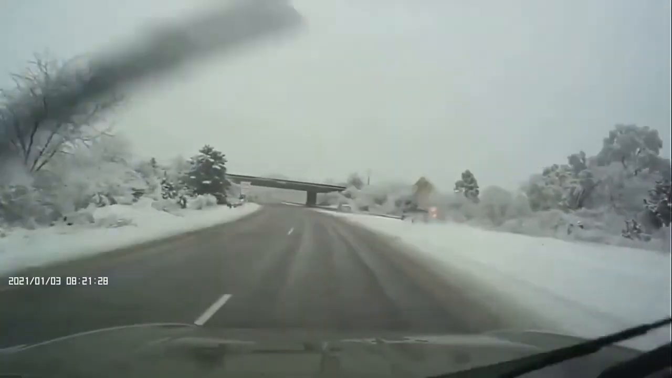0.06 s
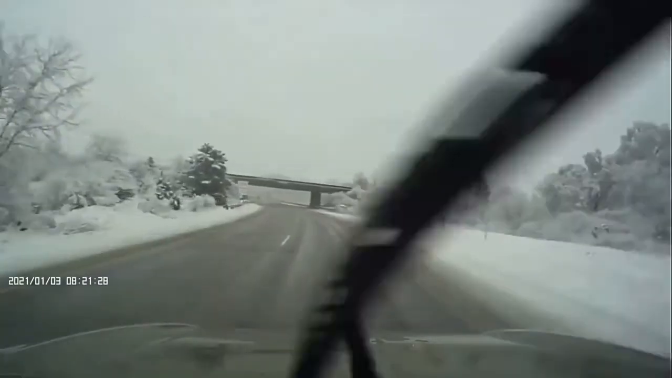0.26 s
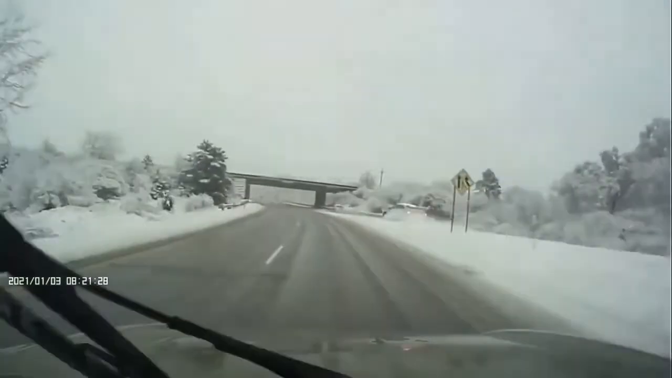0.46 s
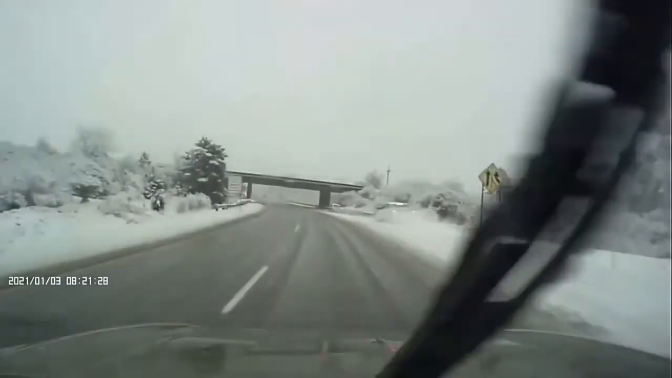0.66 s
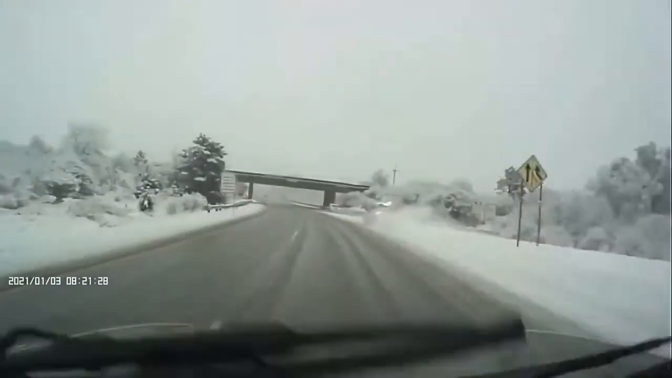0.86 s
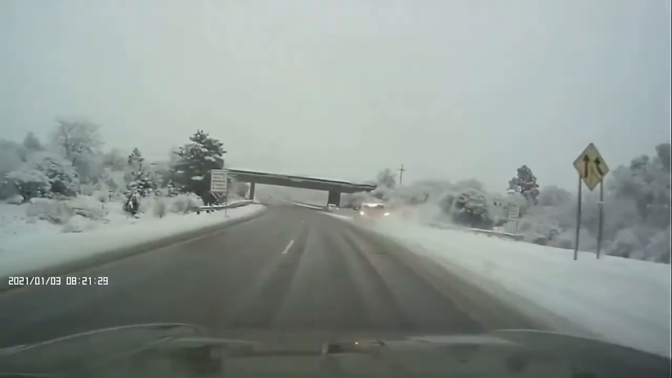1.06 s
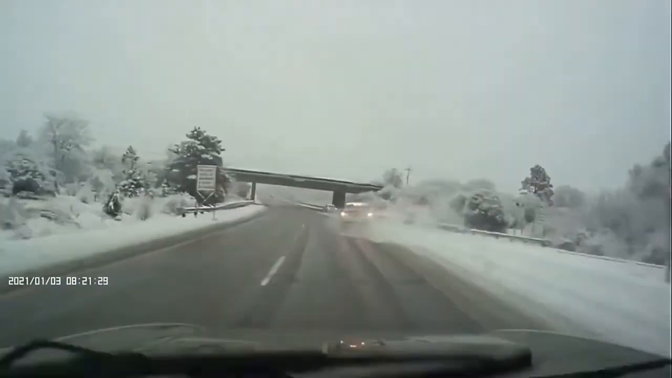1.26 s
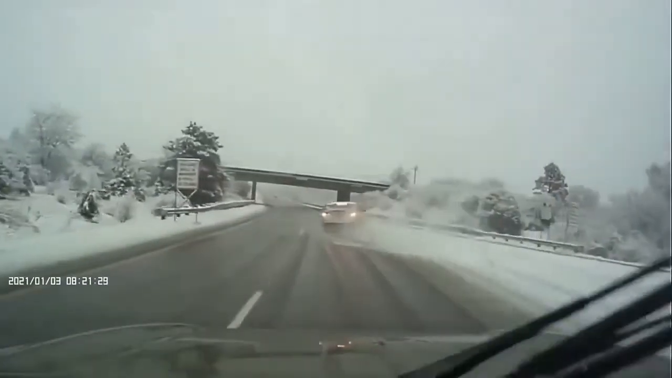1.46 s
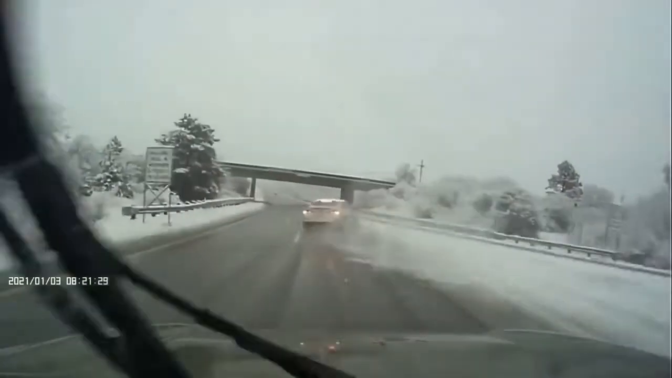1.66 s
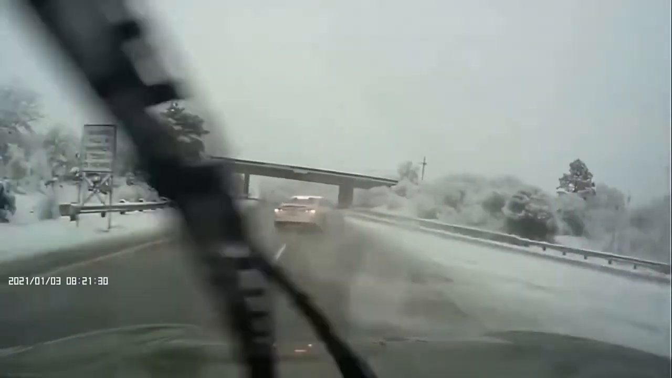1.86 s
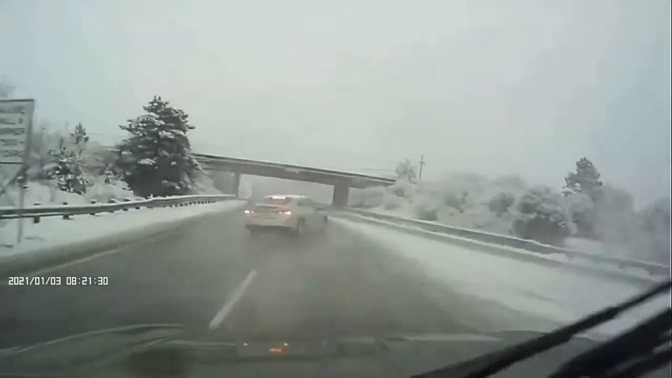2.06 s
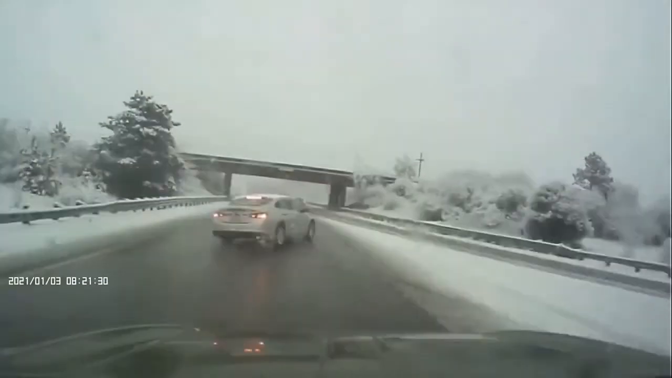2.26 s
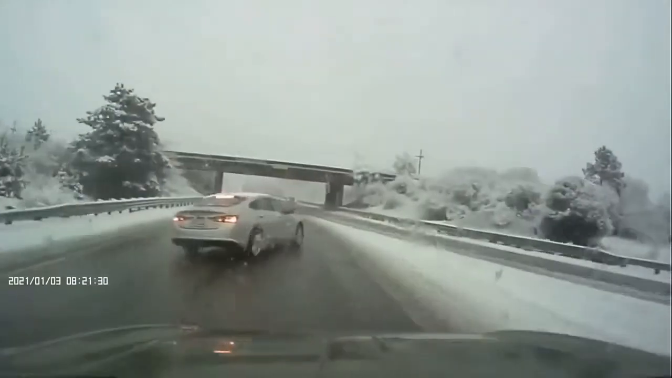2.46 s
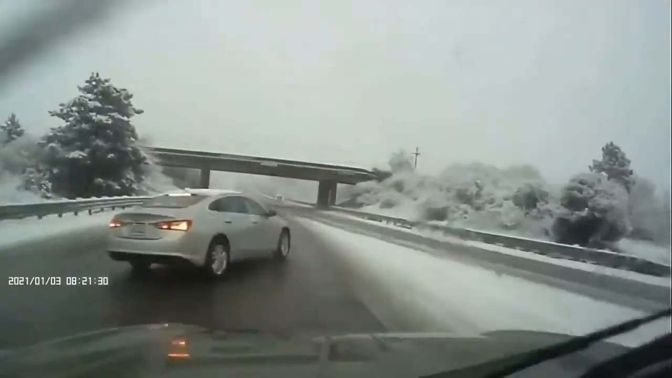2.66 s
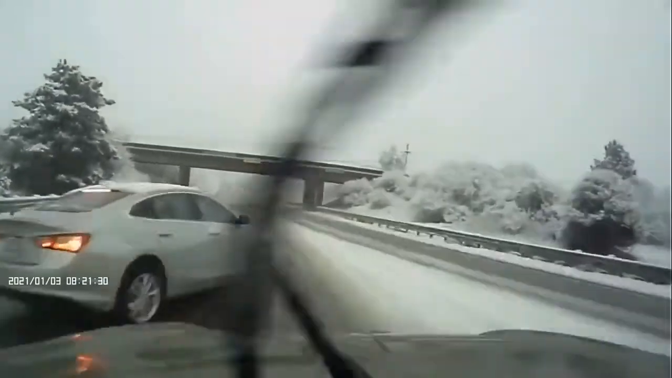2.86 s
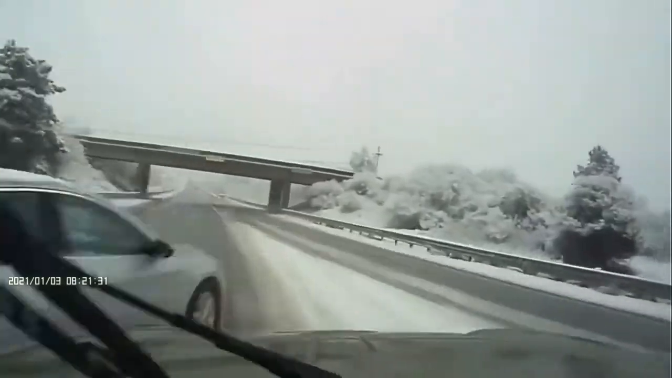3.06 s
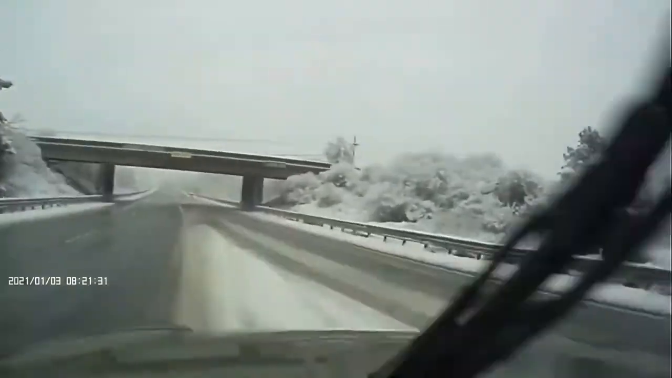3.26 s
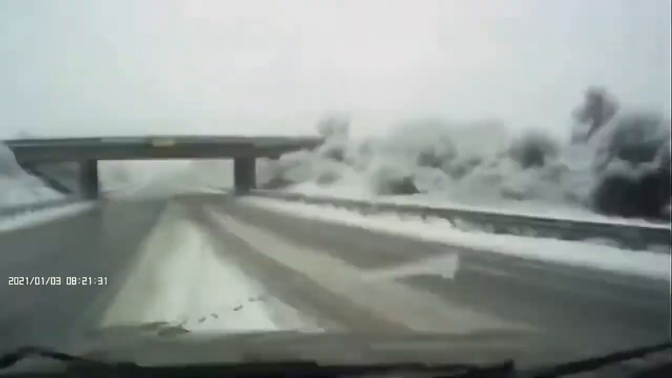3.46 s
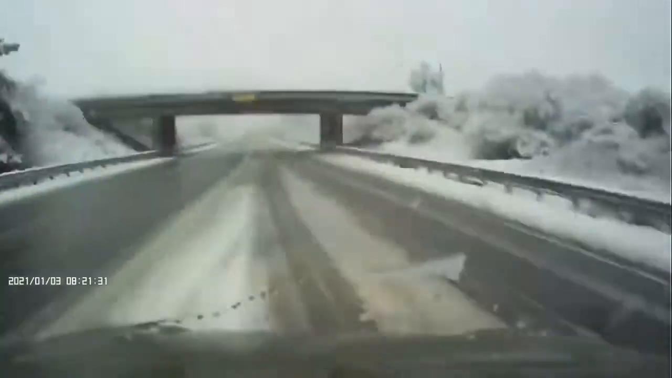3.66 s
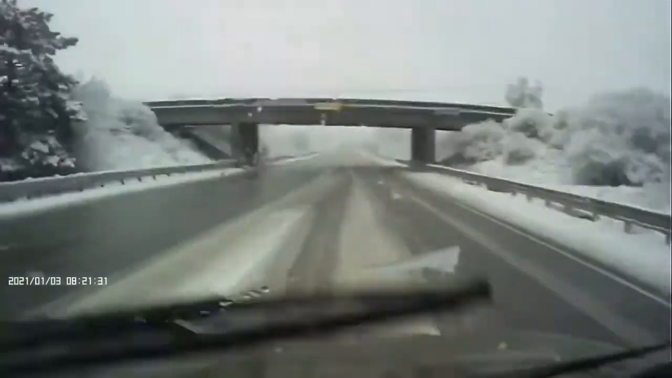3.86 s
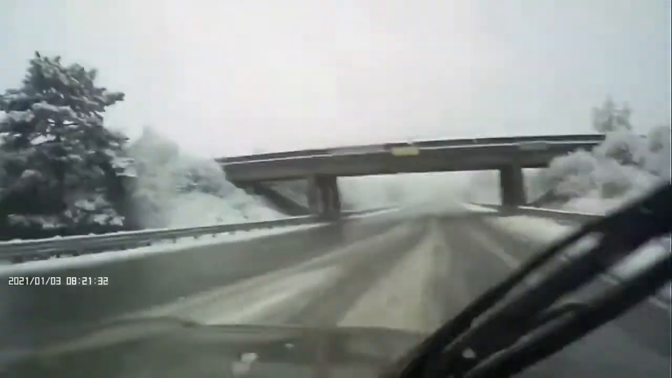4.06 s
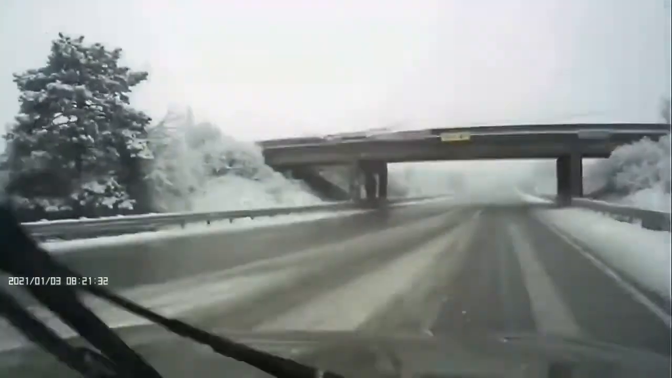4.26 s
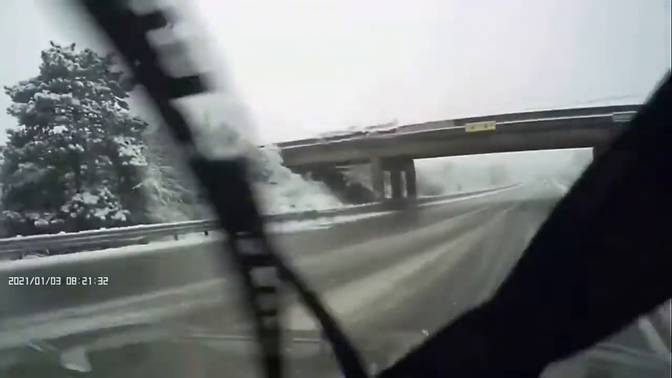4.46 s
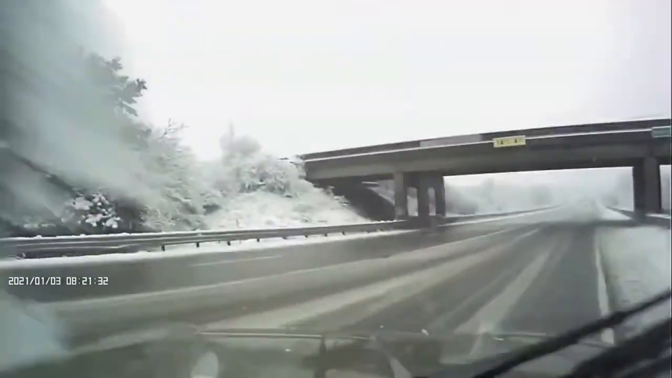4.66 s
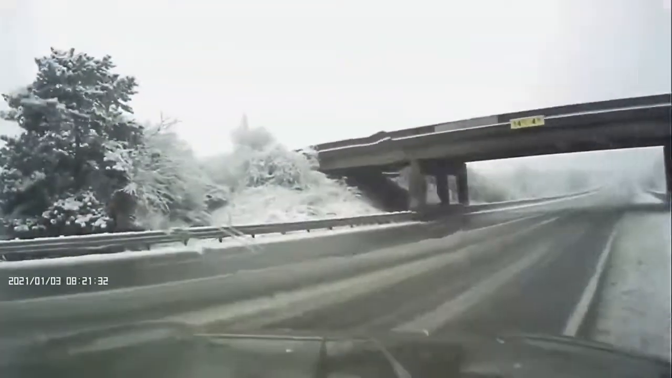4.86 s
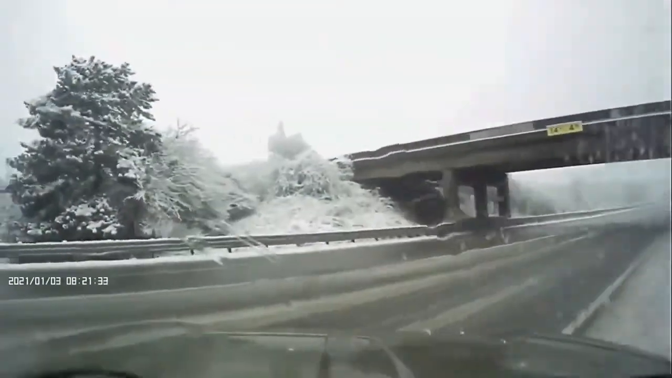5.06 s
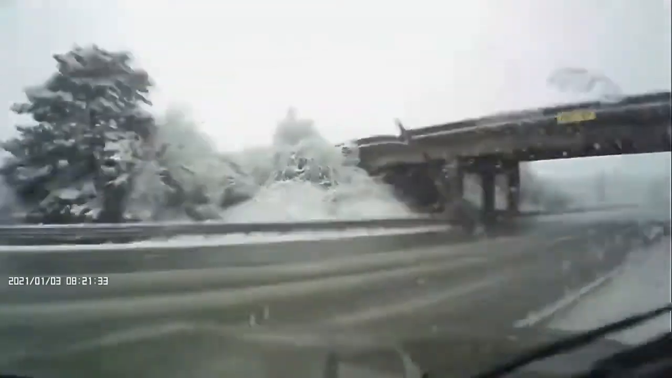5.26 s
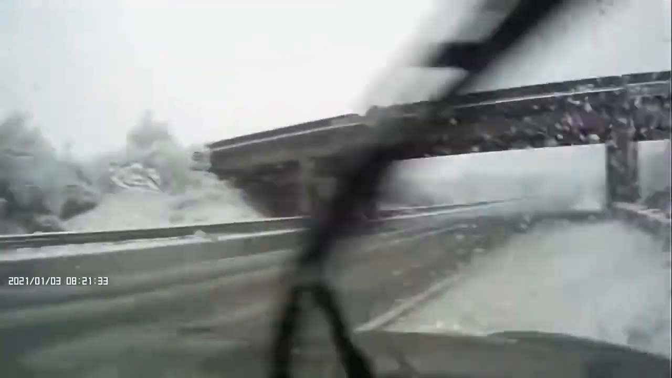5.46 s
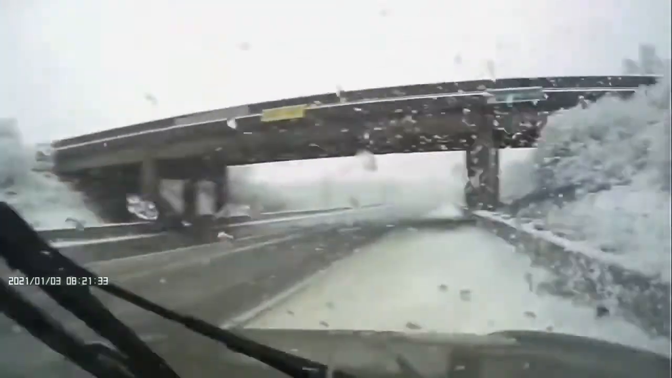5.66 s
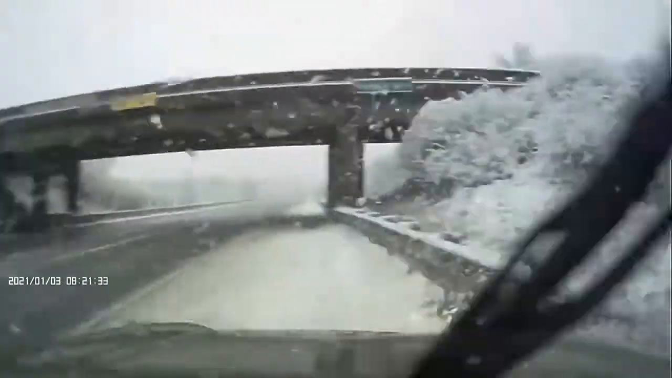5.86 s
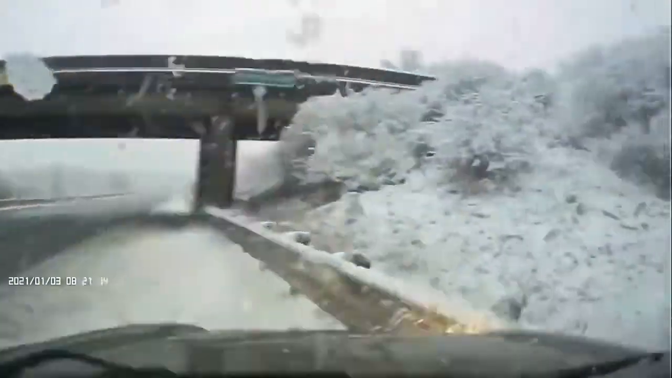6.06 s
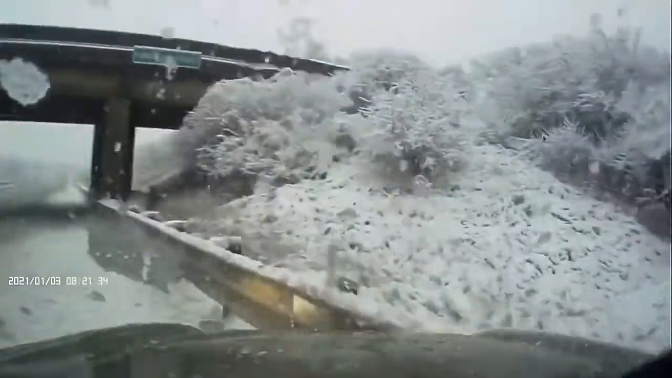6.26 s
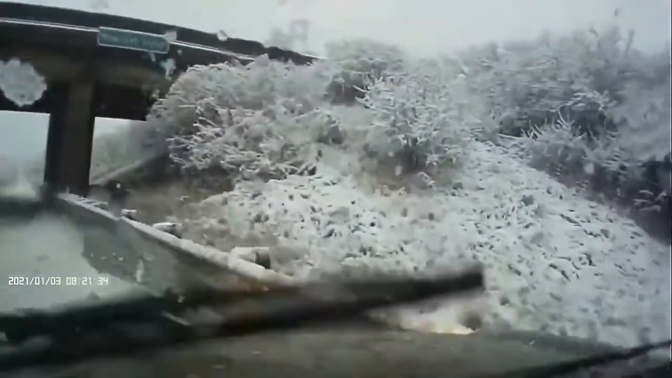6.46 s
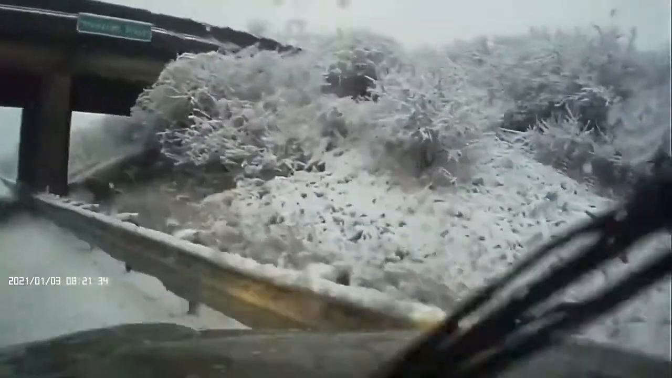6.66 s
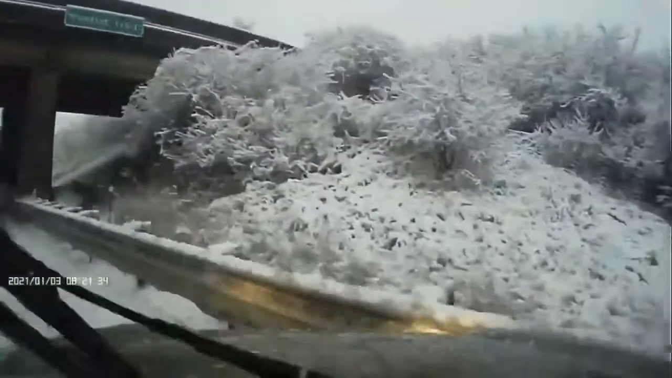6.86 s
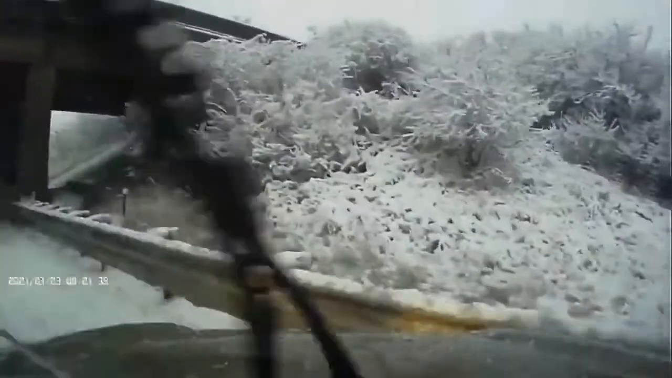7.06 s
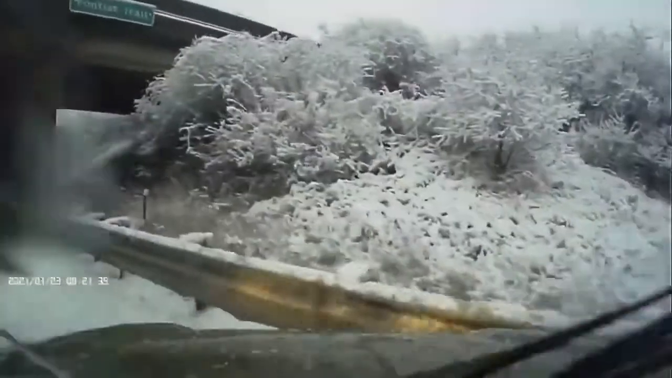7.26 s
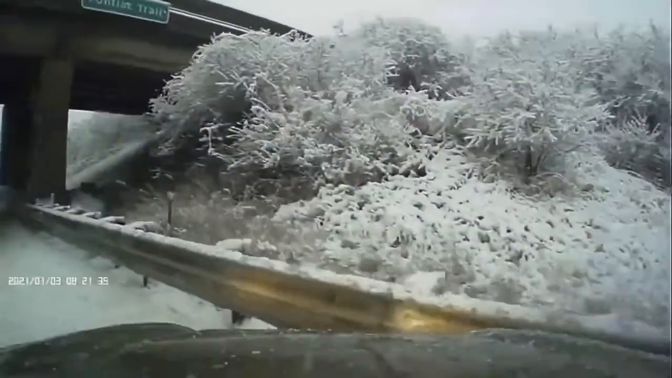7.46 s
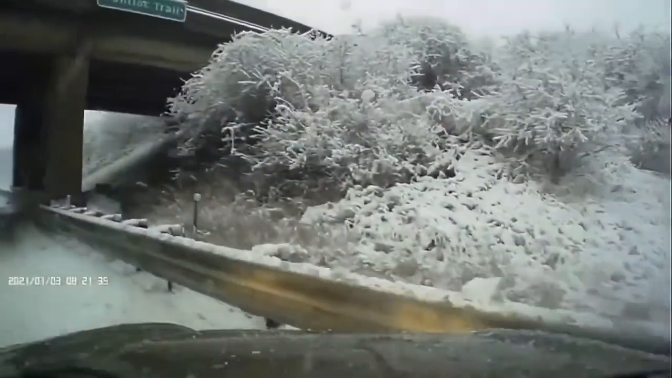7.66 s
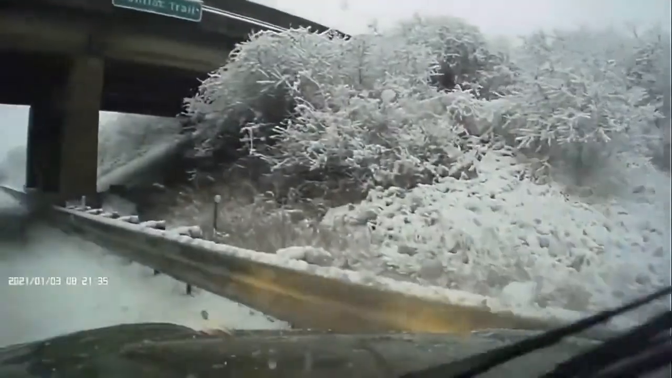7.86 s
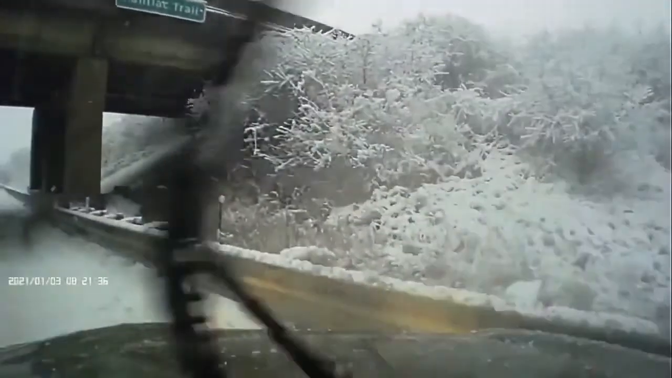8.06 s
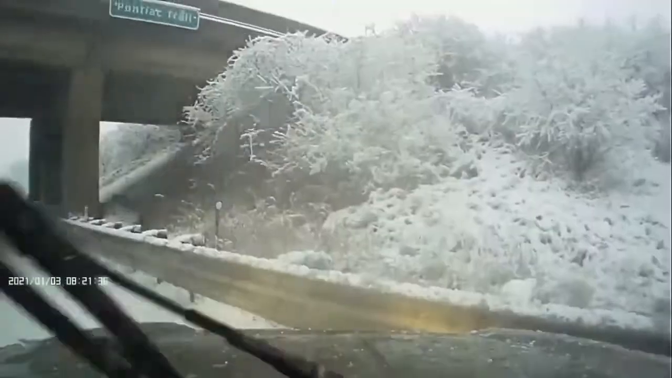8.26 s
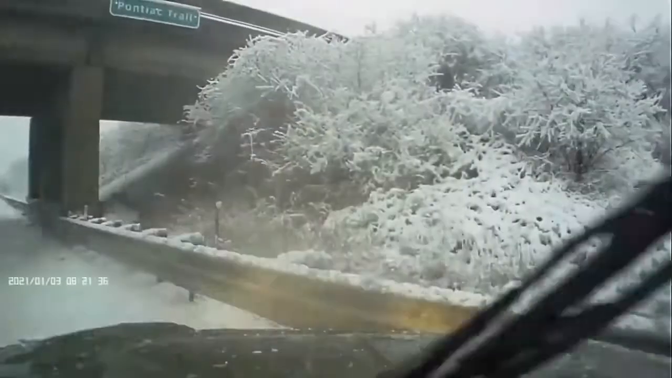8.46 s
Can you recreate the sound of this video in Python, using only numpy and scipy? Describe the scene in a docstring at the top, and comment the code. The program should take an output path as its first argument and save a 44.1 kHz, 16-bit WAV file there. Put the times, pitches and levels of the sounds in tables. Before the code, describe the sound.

Heard from inside a car on a slushy road through a small microphone with faint hiss and thin electrical tones. From 0 to 3.2 seconds there is quiet, steady low-mid road roar, a humming tread drone that drops and fades slightly after 2, deep cabin boom, and a barely audible buzz around 2.4. At 3.27 a light double knock and scrape; at 3.5 the roar gives way to violent thuds, the heaviest near 3.6, deep and distorted with sharp clicks, panel knocks, grinding and trim rattle. Strong jolts continue to about 4.5, with short creaks, then weaker bumps over dragging slush. At 5.38 another hard, hollow bang and grinding, followed by ticks, scrapes and tiny key jingles at 5.5 to 5.8. Smaller knocks and crunches come near 6.4, then sparse creaks and ticks. After 7.5 it is almost still, low rumble fading into hiss by 8.5.

```python
"""Car sliding off a slushy highway

Heard inside the car: road roar, tread drone and cabin boom, then the car clips an obstacle, bucks over
packed slush, scrapes a guard rail and judders to a stop. Thuds, grinding, rattle and boom are noise coloured
by resonances; jolts, knocks, ticks and keys are decaying modes; creaks are sliding tones.
The hardest jolts overload the microphone; faint hiss and electrical tones run throughout."""
import sys
import numpy as np
from scipy import signal
from scipy.fft import rfft, irfft, next_fast_len
from scipy.io import wavfile
from scipy.ndimage import uniform_filter1d, map_coordinates

SR = 44100
rng = np.random.default_rng(int(sys.argv[2]) if len(sys.argv) > 2 else 0)


def to_wav(s):
    """Save 16-bit WAV."""
    ch = np.atleast_2d(s).T  # columns
    pcm = np.round(np.clip(ch, -1, 1) * 32767)  # PCM
    wavfile.write(sys.argv[1], SR, pcm.astype(np.int16))


N = 375715
T = np.arange(N) / SR  # time axis, s

# In every table, relative_db is a level before later gain or normalisation.
# steady drag of slush under the sliding car: time_s, grinding_db
DRAG = [(3.45, -68), (3.52, -25.5), (3.9, -33.5), (4.07, -40.5), (4.3, -24.5), (4.55, -30.5), (4.68, -35.5),
        (4.85, -31), (5.3, -43.5), (5.45, -26), (5.75, -32.5), (6.12, -47), (6.3, -44.5), (6.45, -30.5),
        (6.6, -40.5), (7.05, -45.5), (7.2, -51.5), (7.45, -50), (7.8, -52.5), (8.52, -56)]
DRAG_THUD_DB, DRAG_RATTLE_DB = 6, -24  # relative to the grinding
# bumps over packed slush, rail and bank: start_s, held_s, thudding_db, grinding_db, rattle_db
BUMPS = [(3.515, 0.045, -9, -16.5, -40), (3.582, 0.065, -5.5, -16.5, -38), (3.674, 0.0044, 2, -13, -27),
         (3.691, 0.018, -4.5, -10.5, -29.5), (3.73, 0.005, -16, -25, -44), (3.756, 0.004, -7, -17, -38),
         (3.81, 0.041, -16, -28.5, -51.5), (3.902, 0.036, -26, -35.5, -46.5),
         (3.939, 0.0051, -8.5, -36, -56), (4.019, 0.025, -13.5, -34, -58), (4.095, 0.0062, 1.5, -18.5, -39),
         (4.195, 0.074, -21.5, -33, -51), (4.259, 0.025, -9, -24, -44), (4.371, 0.18, -16.5, -33.5, -51.5),
         (4.48, 0.059, -13, -20.5, -48), (4.698, 0.071, -21.5, -28, -50.5), (4.759, 0.11, -34, -49, -68),
         (4.976, 0.054, -18.5, -40, -60), (5.144, 0.047, -27.5, -32, -60), (5.37, 0.017, -9, -18.5, -42),
         (5.383, 0.013, -9.5, -13.5, -44), (5.5, 0.039, -17, -21.5, -48), (5.6, 0.021, -22, -24, -52.5),
         (5.783, 0.035, -28, -27.5, -42.5), (5.905, 0.1, -40, -53, -61), (6.216, 0.037, -27, -47, -68),
         (6.344, 0.043, -20, -21.5, -52), (6.376, 0.048, -17, -22.5, -47), (6.53, 0.03, -47, -35, -55),
         (6.631, 0.13, -29.5, -63, -67), (6.9, 0.045, -53, -48, -60.5), (6.98, 0.094, -34.5, -42.5, -67),
         (7.258, 0.05, -65, -43, -54), (7.365, 0.078, -56, -44.5, -57), (7.47, 0.17, -59, -73, -65.5),
         (7.711, 0.016, -33.5, -53, -84), (7.921, 0.037, -44, -47.5, -65)]
BUMP_ATTACK_S = 0.0051
# rate of fall after a bump, for thudding, grinding, rattle: fade_db_per_s
BUMP_FADES = [298.5, 340.5, 302.5]
# load on the floor pan, upper over lower modes: time_s, balance_db
PAN_LOAD = [(3.5, 8), (4.0, 1.5), (4.5, 5), (5.0, 20.5), (5.5, 2.5), (6.4, 19), (6.8, 7.5), (7.05, 24.5),
            (8.5, 4.5)]
# floor pan thudding colour: frequency_hz, relative_db (per Hz)
FLOOR_PAN_COLOUR = [(53, -18), (90, 4.5), (124, 7), (189, -5), (273, -7), (362, -22), (400, -16),
                    (520, -53.5), (880, -120)]
# underbody grinding colour: frequency_hz, relative_db (per Hz)
GRINDING_COLOUR = [(190, -27), (330, 5), (369, -3.5), (458, 0), (504, 2.5), (574, 1), (883, -3.5),
                   (1620, -39.5), (1780, -29.5), (2240, -45), (2600, -51.5), (3380, -71), (5720, -120)]
# trim rattle colour: frequency_hz, relative_db (per Hz)
RATTLE_COLOUR = [(760, -9), (1300, 0), (1550, -0.5), (1650, -9), (2050, -7.5), (2450, -10.5), (2870, -7.5),
                 (3300, -13.5), (3900, -13), (4510, -14), (5200, -13.5), (6690, -23), (7660, -21),
                 (8580, -29.5), (10300, -32), (14100, -31), (15500, -53.5)]
# body panel modes: frequency_hz, relative_db, t60_s
PANEL_MODES = [(122, 0, .1), (215, 0, .07), (268, 0, .07), (400, -2, .05), (530, -1, .045), (730, -1, .045),
               (890, -1, .04), (1120, -4, .03)]
# plastic trim modes: frequency_hz, relative_db, t60_s
PLASTIC_MODES = [(1270, -4, 0.015), (1790, -15.5, 0.018), (2863, 11.5, 0.01), (4195, 7, 0.0092),
                 (4520, 5.5, 0.021), (5700, 13.5, 0.0052)]
# jolts that set the whole body ringing: start_s, level_db, pitch_hz, t60_s, pressure_sag (share of the swing)
JOLTS = [(3.519, -6, 45, 0.42, 0.2), (3.632, 10, 37, .75, .85), (3.93, -6, 42, 0.53, 0),
         (4.125, -2.5, 37.3, 0.32, 0), (4.278, -5, 38, 0.53, 0.27), (5.394, 4, 47, .25, .2),
         (5.518, -10, 41.3, 0.3, 0.3)]
# cabin boom: time_s, level_db
BOOM_LEVEL = [(0, -29), (1.97, -28), (2.2, -31), (3.1, -31), (3.33, -22), (3.49, -32), (3.56, -8.5),
              (3.63, -17), (3.8, -20), (3.91, -26), (4.03, -15), (4.21, -23.5), (4.3, -11.5), (4.7, -24),
              (5.36, -23), (5.47, -15), (5.56, -17.5), (5.9, -30.5), (6.35, -30.5), (6.7, -26.5),
              (7.13, -25.5), (7.3, -29.5), (8.08, -30), (8.21, -41), (8.52, -54)]
# cabin boom colour: frequency_hz, relative_db (per Hz)
CABIN_COLOUR = [(11, -45), (18, -4.5), (27, 4), (43, 1), (65, -0.5), (85, -11.5), (97, -10.5), (162, -19),
                (200, -26.5), (260, -46), (440, -120)]
# knocks on the body: start_s, relative_db, favoured_pitch_hz
KNOCKS = [(3.273, -14, 890), (3.281, -9, 460), (3.52, -13.5, 596), (3.538, -4, 496), (3.558, -6, 400),
          (3.594, -6, 500), (3.698, -2, 590), (3.737, 4, 610), (3.76, -8, 500), (3.815, -20, 597),
          (3.864, -1, 338), (3.945, -1, 305), (4.002, -13.5, 400), (4.098, -5, 150), (4.205, -9, 334),
          (4.268, -10, 493), (4.293, -14, 594), (4.324, -13, 680), (4.385, -5.5, 480), (4.415, -14, 550),
          (4.496, -10, 403), (4.52, -7, 845), (4.603, -6.5, 169), (4.705, -12, 500), (4.745, -13, 280),
          (4.779, -18, 250), (4.829, -11, 600), (4.865, -6.5, 141), (4.934, -12.5, 540), (4.987, -5, 270),
          (5.027, -9, 247), (5.31, -16.5, 280), (5.372, -3, 400), (5.382, 2.5, 550), (5.392, 5, 530),
          (5.409, -9.5, 795), (5.433, -14, 500), (5.449, -9.5, 700), (5.51, -16, 400), (5.518, -22, 600),
          (5.533, -14.5, 900), (5.605, -3.5, 494), (5.79, -13, 593), (6.217, -15, 213), (6.37, -15.5, 805),
          (6.385, -2.5, 302), (6.408, -8.5, 600), (6.418, -8, 200), (6.425, -5.5, 270), (6.46, -10.5, 500),
          (6.575, -17, 201), (6.932, -22.5, 900), (6.946, -25, 214), (6.983, -23, 794), (6.996, -21, 268),
          (7.029, -16.5, 245), (7.288, -20.5, 814), (7.516, -28.5, 390), (7.683, -33, 1100),
          (7.712, -20.5, 215), (7.745, -33, 755), (7.921, -31.5, 1110), (8.085, -31.5, 730),
          (8.462, -30.5, 295)]
# short scrapes: start_s, level_db, length_s
SCRAPES = [(3.272, -42.5, 0.015), (4.197, -49.5, 0.018), (4.7, -52, 0.0068), (5.214, -51.5, 0.048),
           (5.786, -43, 0.064), (5.908, -45, 0.041), (6.498, -46.5, 0.03), (6.549, -34, 0.008),
           (6.63, -59, 0.083), (6.793, -60.5, 0.12), (7.271, -49, 0.046), (7.366, -51.5, 0.07)]
# creaks of loaded bodywork: start_s, length_s, level_db, first_pitch_hz, last_pitch_hz
CREAKS = [(3.942, 0.026, -11, 216, 316), (4.018, 0.015, -20, 700, 800), (4.288, 0.015, -13.5, 495, 703),
          (4.545, 0.035, -16, 259, 304), (5.47, 0.028, -38, 900, 970), (5.64, 0.084, -30, 898, 857),
          (5.895, 0.04, -34.5, 834, 890), (6.44, 0.049, -34, 947, 810), (6.925, 0.0237, -39, 598, 1010),
          (6.984, 0.026, -29.5, 925, 257), (7.243, 0.023, -42, 995, 950), (7.374, 0.026, -39, 964, 900),
          (7.543, 0.065, -43, 610, 570)]
# sharp broadband clicks, mostly as the microphone overloads at wave peaks: start_s, relative_db
CLICKS = [(3.5232, -32), (3.567, -29), (3.597, -35), (3.644, -29), (3.651, -30), (3.676, -31), (3.683, -31),
          (3.7014, -32), (3.7314, -31), (3.7596, -20), (3.739, -30), (3.818, -46), (3.9433, -31),
          (3.9755, -31), (4, -40), (4.042, -36), (4.066, -35), (4.1046, -42.5), (4.106, -36),
          (4.123, -40.5), (4.139, -37), (4.1674, -34.5), (4.2884, -30), (4.2974, -33), (4.311, -35),
          (4.415, -40.5), (4.534, -35), (5.379, -43.5), (5.387, -28), (5.3925, -23.5), (5.409, -32.5),
          (5.45, -46), (5.509, -49.5), (5.537, -51), (5.606, -39), (5.977, -34.5), (6.28, -52),
          (6.3457, -43.5), (6.387, -40), (6.428, -45), (7.1423, -50)]
# click colour: frequency_hz, relative_db (per Hz)
CLICK_COLOUR = [(600, -26), (1300, 6.5), (3000, 6.5), (6000, -3.5), (14500, -3.5), (15800, -15.5)]
# ticks of trim and loose things: start_s, relative_db, favoured_pitch_hz
TICKS = [(2.3995, -45, 4200), (3.3243, -50, 4200), (3.866, -37.5, 1800), (3.908, -40, 4200),
         (3.93, -46, 2900), (4.121, -40, 2880), (4.197, -41, 2940), (4.8289, -42, 3000), (4.86, -44, 4500),
         (4.912, -39, 4500), (5.1306, -47, 4200), (5.156, -41, 4200), (5.1906, -33.5, 4170),
         (5.432, -45, 2900), (5.5824, -31, 2970), (5.6892, -37, 1800), (5.9142, -36, 2900),
         (5.974, -38.5, 2900), (6.0264, -37.5, 4600), (6.036, -41.5, 4500), (6.077, -46, 2900),
         (6.2334, -36, 4200), (6.3725, -43, 2930), (6.6283, -47, 2900), (6.9, -40.5, 4200),
         (6.9314, -45, 2900), (7.3423, -39.5, 4500), (7.639, -43, 4200), (7.683, -42, 1800),
         (7.9209, -53, 2900), (7.953, -56, 4500), (8.1938, -51, 4200)]
# jingles of the keys: start_s, relative_db
JINGLES = [(5.5484, -46.5), (5.7274, -46.5), (5.7424, -42.5), (5.8142, -46), (5.8294, -45.5)]
# key modes: frequency_hz, relative_db, t60_s
KEY_MODES = [(7200, 9, 0.066), (7740, 2, 0.27), (10900, 1, 0.22), (11700, 6, 0.097), (13600, 8, .06)]
# loose part buzzing on the dashboard under braking: time_s, relative_db
BUZZ_LEVEL = [(2.2, -100), (2.36, -72), (2.44, -69), (2.6, -78), (2.75, -84), (3.0, -78), (3.2, -76),
              (3.4, -110)]
# road roar: time_s, level_db
ROAR_LEVEL = [(0, -36.5), (2.0, -36.5), (2.8, -38), (3.45, -36), (3.8, -88)]
# road roar colour: frequency_hz, relative_db (per Hz)
ROAR_COLOUR = [(88, -45), (150, -13), (192, -5.5), (275, -0.5), (302, -4), (371, -15), (420, -19),
               (496, -13.5), (601, -19), (791, -19), (1240, -36.5), (1390, -37), (2190, -53), (3350, -61),
               (4000, -59.5), (5200, -78.5), (8800, -120)]
# wheels: time_s, turn_rate_hz, drone_relative_db
WHEELS = [(0, 9.66, -40), (.8, 9.72, -40), (1.6, 9.8, -39), (1.8, 9.7, -40), (2.0, 9.42, -43),
          (2.2, 9.2, -55), (3.3, 8, -60)]
# tread drone partials: multiple_of_turn_rate, relative_db
TREAD_PARTIALS = {23: -6, 24: -9, 27: 0, 28: -4, 30: -1, 32: -6, 51: -14}
# microphone hiss colour: frequency_hz, relative_db (per Hz)
HISS_COLOUR = [(880, -38), (1500, -13.5), (1920, -10.5), (2160, -18), (2410, -11.5), (5150, -16.5),
               (14200, -20), (15800, -24)]
# faint electrical tones: frequency_hz, relative_db
WHINE_TONES = [(4237, -95.5), (8032, -93.5)]
HISS_DB, TOP_HZ = -71.5, 15900  # hiss rms level, upper limit of the band


def amp(db):
    """The decibel law: 20 dB is a factor of ten in amplitude."""
    return 10 ** (np.asarray(db) / 20)


def unit(x):
    """Normalisation to an rms of 1."""
    return x / np.sqrt(np.mean(x ** 2) + 1e-20)


def curves(rows):
    """Linear interpolation: one value per sample for each column after the time."""
    s, *cols = np.transpose(rows)
    return [np.interp(T, s, c) for c in cols]


def wobble(rate):
    """Slow random fluctuation: a smooth curve through random knots, rate knots a second."""
    coarse = T[::64]
    knots = rng.standard_normal(int(N * rate / SR) + 4)
    return np.interp(T, coarse, map_coordinates(knots, [coarse * rate]))


def filtered(x, response):
    """Linear filtering: the spectrum of x times a response of frequency."""
    m = next_fast_len(N + SR // 2)
    hz = np.fft.rfftfreq(m, 1 / SR)
    return irfft(rfft(x, m) * response(hz), m)[:N]


def coloured(x, points):
    """Spectral colouring: x shaped by levels joined over log frequency, then set to rms 1."""
    f, db = np.transpose(points)
    log_f = np.log(f + 1)
    return unit(filtered(x, lambda hz: amp(np.interp(np.log(hz + 1), log_f, db))))


def patchy(depth_db):
    """Non-stationary noise: random louder and softer patches in time and frequency."""
    spectra = signal.stft(rng.standard_normal(N + 512), nperseg=512)[2]
    field = uniform_filter1d(rng.standard_normal(spectra.shape), 4, 0)
    field = uniform_filter1d(field, 6, 1, mode="wrap")
    return signal.istft(spectra * amp(depth_db * unit(field)), nperseg=512)[1][:N]


def gritty(rate, spread_db, burst_s, share):
    """Random contact: noise swelled by uneven bursts, rate a second, with its slow level evened out."""
    starts = (rng.random(N) < rate / SR) * amp(spread_db * rng.standard_normal(N))
    fade = np.exp(-T[:SR // 10] / burst_s)
    share = np.clip(share, 0, .9)
    bursts = unit(signal.fftconvolve(starts, fade)[:N])
    lumps = share * bursts + 1 - share
    slow_power = uniform_filter1d(uniform_filter1d(lumps ** 2, SR // 20), SR // 20)
    return lumps / np.sqrt(slow_power) * patchy(3.3)


def pelted(modes, rate, spread_db):
    """Random excitation: each mode is struck at its own chance moments, rate a second; rms 1."""
    t, out = T[:SR // 8], np.zeros(N)
    for hz, db, t60 in modes:
        blows = (rng.random(N) < rate / SR) * amp(spread_db * rng.standard_normal(N))
        onset = 1 - np.exp(-t / 0.00047)
        ring = amp(db - 60 * t / t60) * np.sin(2 * np.pi * hz * t) * onset
        out += signal.oaconvolve(blows, ring)[:N]
    return unit(out)


def struck(events, modes, gain_db, scatter, crack, attack_s, focus_db=0):
    """Modal excitation: each blow rings decaying modes, favouring those near its pitch if it has one."""
    out, t = np.zeros(N + SR), T[:SR // 7]
    hz, level, t60 = np.transpose(modes)[..., None]
    chance = rng.standard_normal((len(events), 2, len(modes), 1))
    for (s, db, *pitch), (strength, detune) in zip(events, chance):
        near_db = -focus_db * np.abs(np.log2(hz / pitch[0])) if pitch else 0
        decay = amp(level + near_db + 2.2 * strength - 60 * t / t60)
        ring = decay * np.sin(2 * np.pi * hz * (1 + scatter * detune) * t)
        # stepped noise roughens the ring
        rough = 1 + crack * rng.standard_normal(len(t) // 8 + 1).repeat(8)[:len(t)]
        onset = 1 - np.exp(-t / attack_s)
        out[round(s * SR):][:len(t)] += amp(db + gain_db) * ring.sum(axis=0) * rough * onset
    return out[:N]


def sliding():
    """Friction and impact: slush and rail thud and grind on the underbody, and the shaking rattles the trim."""
    thudding, grinding, rattling = shaking()
    thud = coloured(gritty(40, 1.2, 0.0071, 0.23), FLOOR_PAN_COLOUR)
    lower = filtered(thud, lambda hz: 1 / (1 + (hz / 185) ** 8))
    upper = thud - lower
    half_load_db = curves(PAN_LOAD)[0] / 2
    thud = amp(-half_load_db) * lower + amp(half_load_db) * upper
    # lumps of ice ring the upper panel modes within the grinding
    grind = coloured(gritty(90, 9, 0.012, 0.5), GRINDING_COLOUR)
    grind = grind + 0.5 * pelted(PANEL_MODES[3:], 60, 3.7)
    rattle = coloured(gritty(160, 6, 0.003, 0.5), RATTLE_COLOUR)
    rattle = rattle + .23 * pelted(PLASTIC_MODES[:5], 60, 5)
    return thudding * thud + grinding * grind + rattling * rattle


def shaking():
    """Addition of powers: each bump rises, holds and fades over the drag, for thudding, grinding and rattle."""
    drag_db = curves(DRAG)[0]
    steady = amp([drag_db + DRAG_THUD_DB, drag_db, drag_db + DRAG_RATTLE_DB])
    power, t = np.zeros((3, N + SR)), T[:SR // 3]
    rise = np.clip(t / BUMP_ATTACK_S, 0, 1)
    for s, held, *db in BUMPS:
        fading_s = np.clip(t - BUMP_ATTACK_S - held, 0, None)
        fade_db = np.outer(BUMP_FADES, fading_s)
        power[:, round(s * SR):][:, :len(t)] += (rise * amp(np.c_[db] - fade_db)) ** 2
    return np.sqrt(power[:, :N] + steady ** 2)


def jolts():
    """Damped oscillation: the body swings at its low mode while the cabin pressure sags and recovers."""
    out, t = np.zeros(N + SR), T[:SR]
    onset = 1 - np.exp(-t / 0.005)
    for s, db, hz, t60, sag in JOLTS:
        swing = -np.sin(2 * np.pi * hz * t) - sag * np.exp(-t / 0.11)
        out[round(s * SR):][:SR] += amp(db - 60 * t / t60) * swing * onset
    return out[:N]


def boom():
    """Cavity resonance: cabin air and floor pan rumble, as low noise that swells and sinks."""
    return amp(curves(BOOM_LEVEL)[0] + 0.79 * wobble(14)) * coloured(rng.standard_normal(N), CABIN_COLOUR)


def knocks():
    """Panel modes: where a knock lands on the body decides which modes ring most."""
    return struck(KNOCKS, PANEL_MODES, -2.2, scatter=0.044, crack=0.0063, attack_s=0.0012, focus_db=16)


def scrapes():
    """Sliding friction: a lumpy rasp in the plastic's resonances starts at once, holds and dies."""
    contact, t = np.zeros(N + SR), T[:SR // 5]
    for s, db, length in SCRAPES:
        contact[round(s * SR):][:len(t)] += amp(db) * np.exp(-(t / length) ** 2)
    rasp = coloured(gritty(150, 5, 0.004, 0.5), RATTLE_COLOUR)
    rasp = rasp + .5 * pelted(PLASTIC_MODES[1:5], 500, 4)
    return contact[:N] * unit(rasp)


def creaks():
    """Frictional tone: a slipping joint sings briefly, a wavering pitch that swells, slides and fades."""
    waver, shiver_db = 0.036 * wobble(90), 4 * wobble(120)  # share of the pitch, level
    out = np.zeros(N)
    for s, length, db, first_hz, last_hz in CREAKS:
        span = slice(round(s * SR), round((s + length) * SR))
        u = (T[span] - s) / length  # progress from 0 to 1
        hz = first_hz * (last_hz / first_hz) ** u * (1 + waver[span])
        tone = np.sin(2 * np.pi * np.cumsum(hz) / SR)
        out[span] += amp(db + shiver_db[span]) * np.sin(np.pi * u) * tone
    return out


def ticks():
    """Heavily damped modes: trim and loose things tick as small plastic resonances die at once."""
    return struck(TICKS, PLASTIC_MODES, -11.5, scatter=0.031, crack=0.42, attack_s=0.00077, focus_db=17.5)


def jingle():
    """Lightly damped modes: struck keys ring on in high partials."""
    return struck(JINGLES, KEY_MODES, -17.0, scatter=0.002, crack=0.057, attack_s=0.0011)


def buzz():
    """Repeated impact: faint random taps excite two plastic resonances."""
    modes = [(4180, 0, .011), (2900, -6, .008)]  # frequency_hz, relative_db, t60_s
    return amp(curves(BUZZ_LEVEL)[0] - 1) * pelted(modes, 140, 3)


def rolling():
    """Periodic excitation: the tread drones on multiples of the wheel turn, over the noise of the road."""
    turns_hz, drone_db = curves(WHEELS)
    turn = 2 * np.pi * np.cumsum(turns_hz) / SR
    drone = np.zeros(N)
    for k, db in TREAD_PARTIALS.items():
        drone += amp(db + 1.5 * wobble(1.62)) * np.sin(k * turn + 2 * np.pi * rng.random())
    roar = amp(curves(ROAR_LEVEL)[0] + 0.87 * wobble(6.17)) * coloured(patchy(0.37), ROAR_COLOUR)
    return roar + amp(drone_db) * (T < 3.5) * drone  # the drone ends at 3.5 s


def overload_clicks():
    """Broadband transients: sharp clicks, mostly of an overloaded microphone, as very short bursts of noise."""
    burst, t = np.zeros(N + SR), T[:SR // 100]
    for s, db in CLICKS:
        burst[round(s * SR):][:len(t)] += amp(db - 2.5) * np.exp(-t / 0.00056)
    return burst[:N] * coloured(rng.standard_normal(N), CLICK_COLOUR)


def scene():
    """Superposition: all layers add."""
    impacts = sliding() + jolts() + boom() + knocks()
    details = scrapes() + creaks() + ticks() + jingle()
    return (impacts + details + buzz() + rolling() + overload_clicks())[None]


def clip(x, top, hardness):
    """Saturation: the output bends towards a ceiling, more abruptly with greater hardness."""
    return x / (1 + np.abs(x / top) ** hardness) ** (1 / hardness)


def record(dry):
    """Overload: the capsule saturates, a coupling capacitor lets flat tops droop, the converter clips."""
    x = clip(dry[0], 0.59, 12) + .025 * dry[0]  # a little still passes at full swing
    x = filtered(x, lambda hz: 1j * hz / (7 + 1j * hz))  # 7 Hz high-pass
    x = clip(x, .75, 18)
    # steady hiss and whine are added whatever the level
    whine = np.zeros(N)
    for hz, db in WHINE_TONES:
        whine += amp(db + 6.5 + 1.8 * wobble(3.6)) * np.sin(2 * np.pi * hz * T)
    x = x + amp(HISS_DB) * coloured(patchy(1.3), HISS_COLOUR) + whine
    return filtered(x, lambda hz: hz < TOP_HZ)[None]


dry = scene()
out = record(dry)
to_wav(out)
```